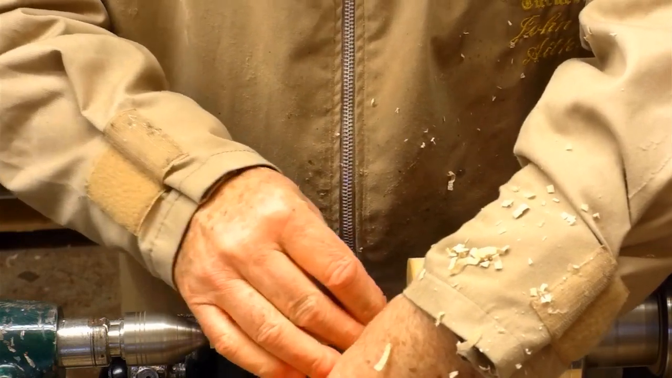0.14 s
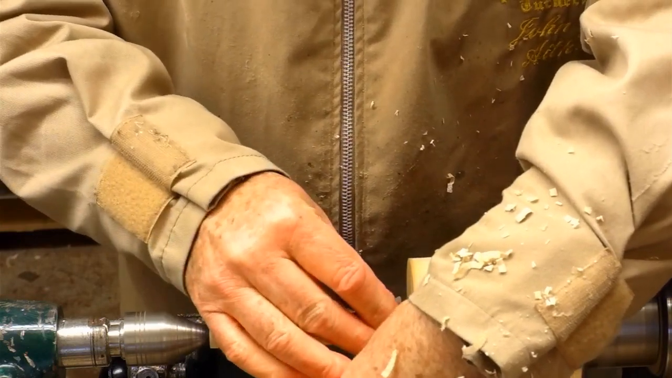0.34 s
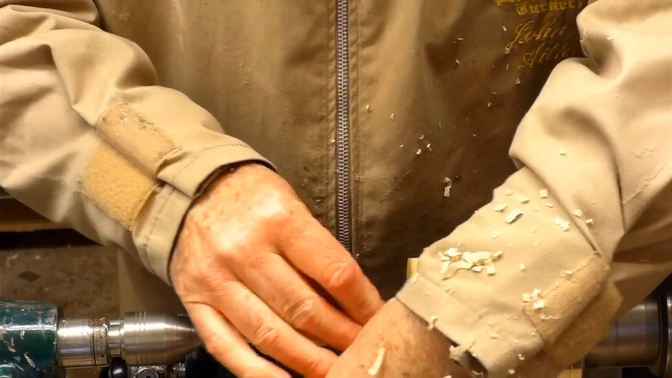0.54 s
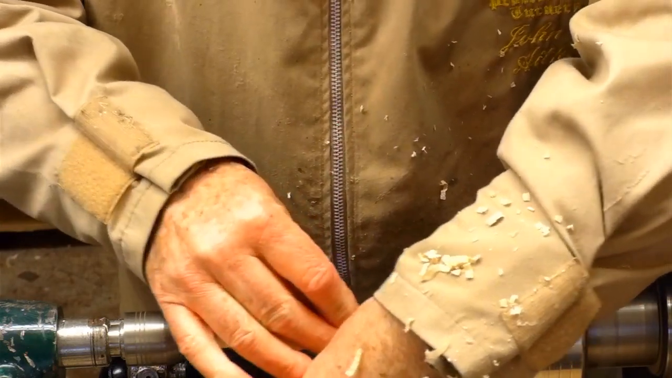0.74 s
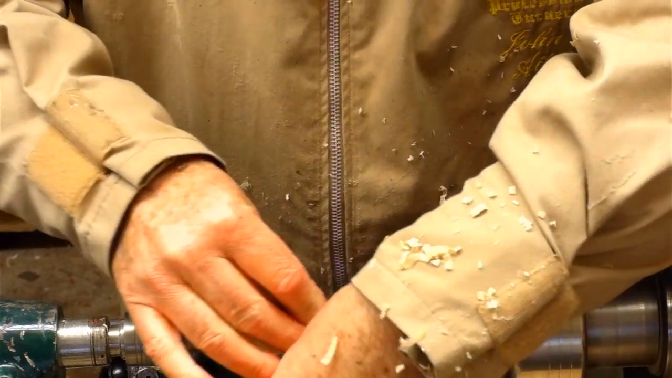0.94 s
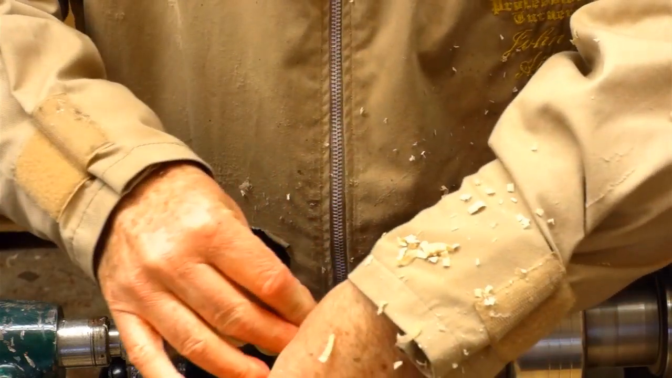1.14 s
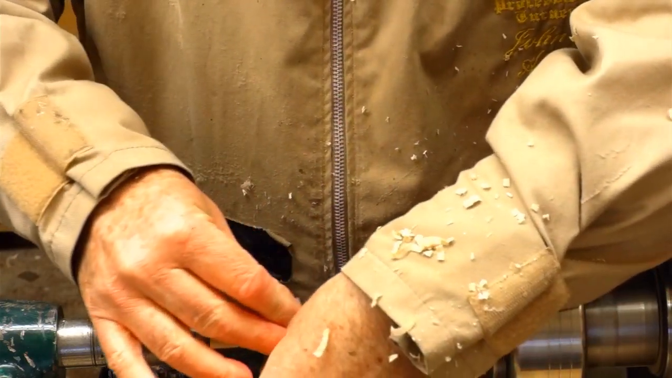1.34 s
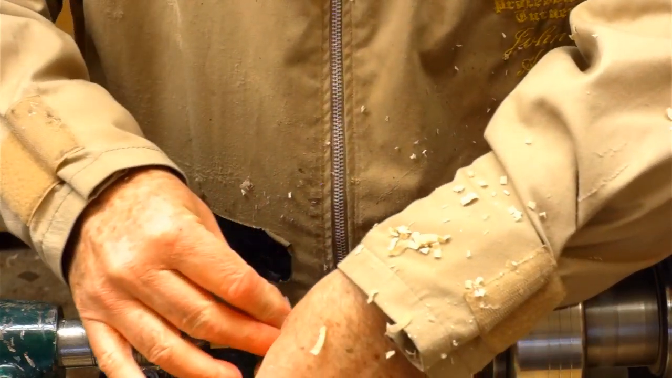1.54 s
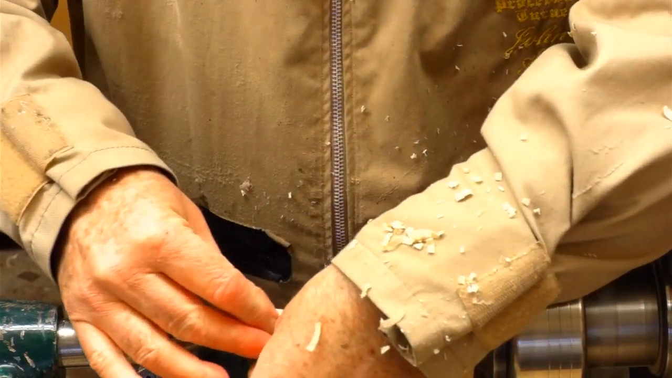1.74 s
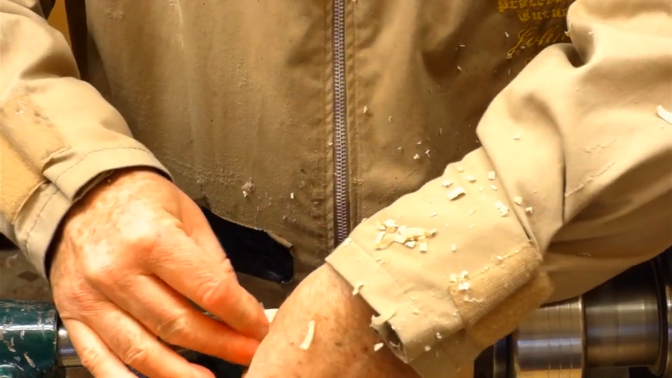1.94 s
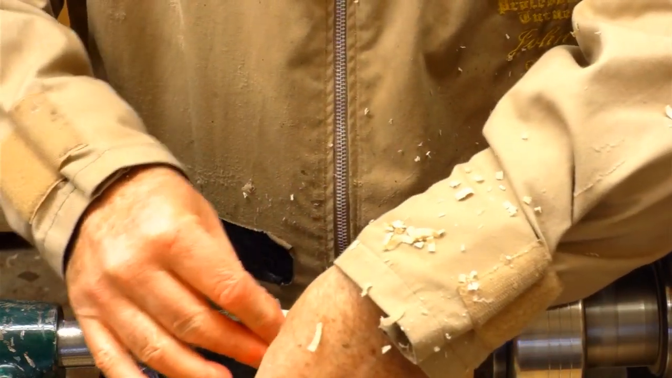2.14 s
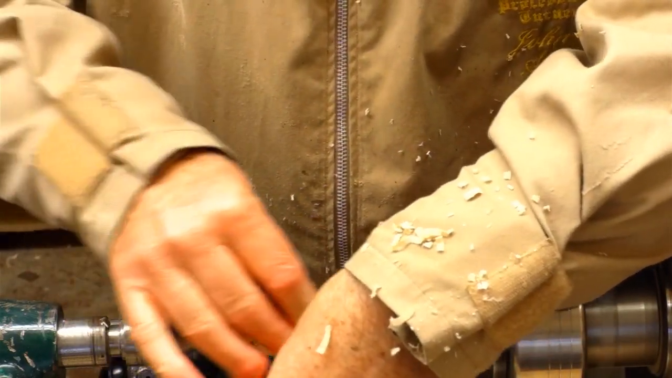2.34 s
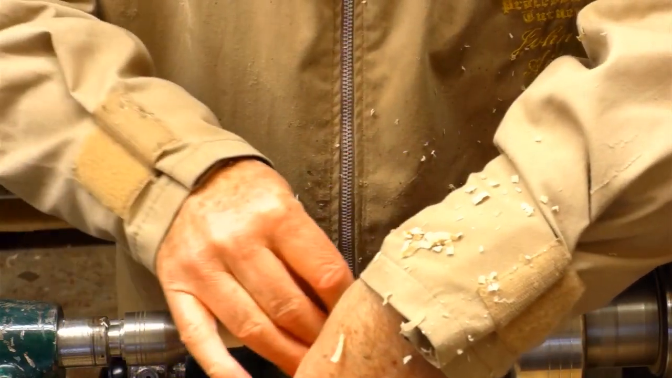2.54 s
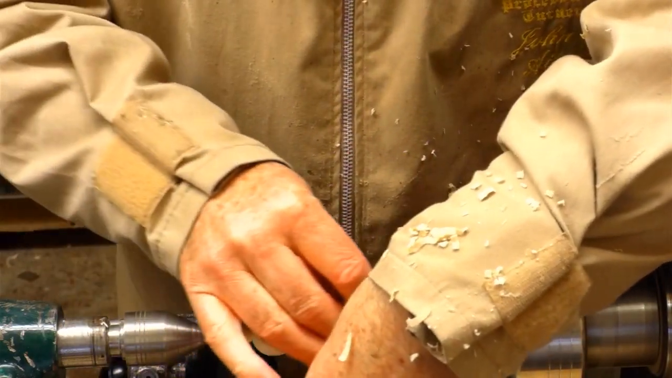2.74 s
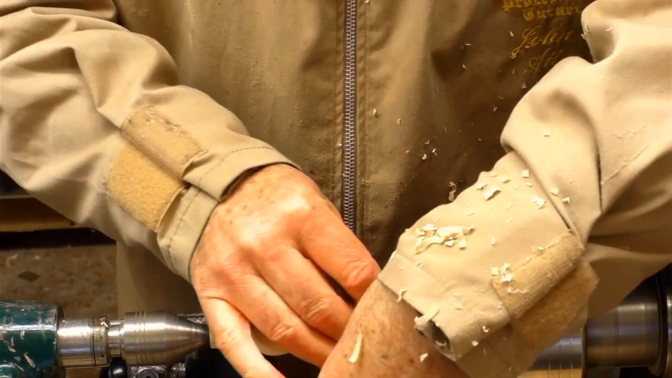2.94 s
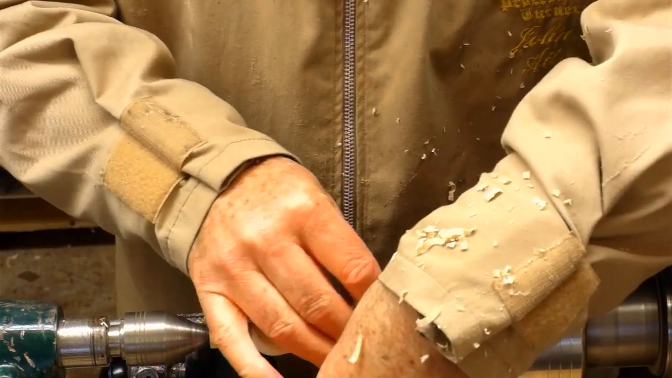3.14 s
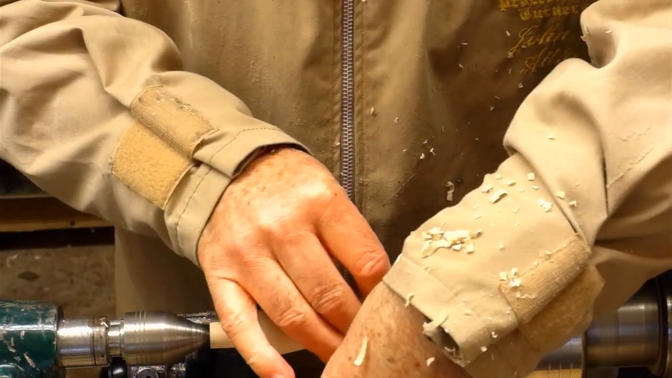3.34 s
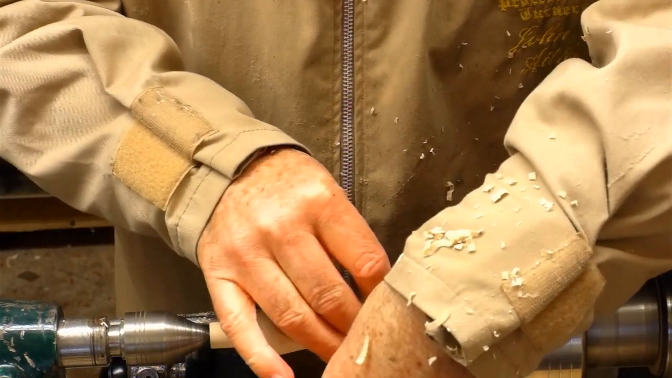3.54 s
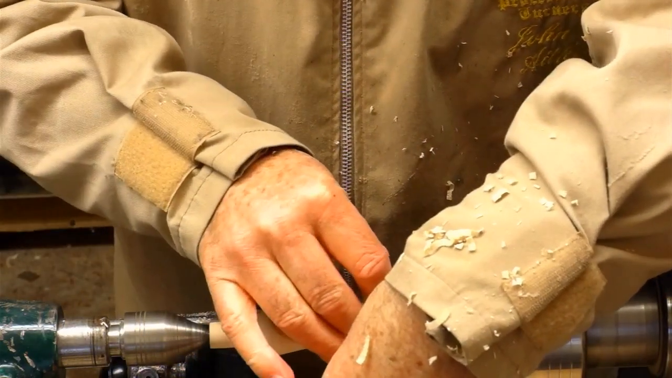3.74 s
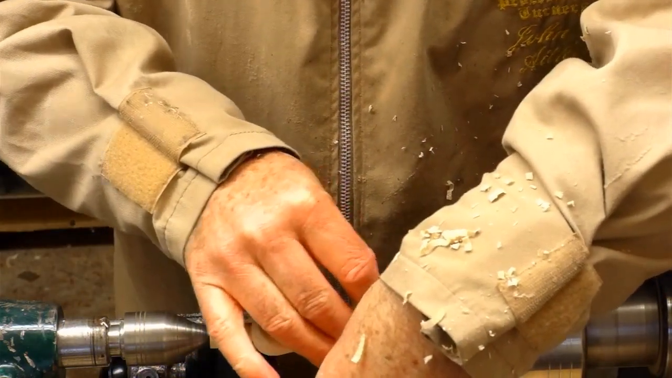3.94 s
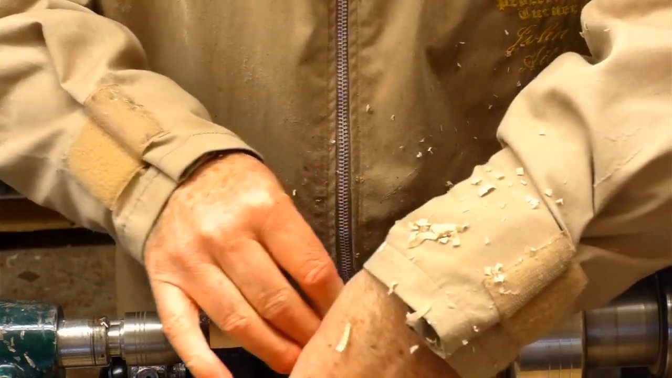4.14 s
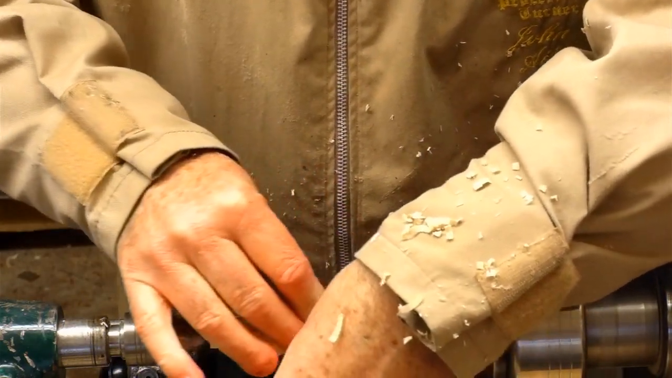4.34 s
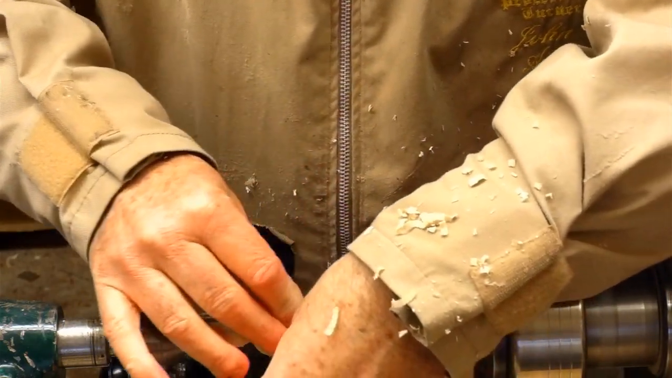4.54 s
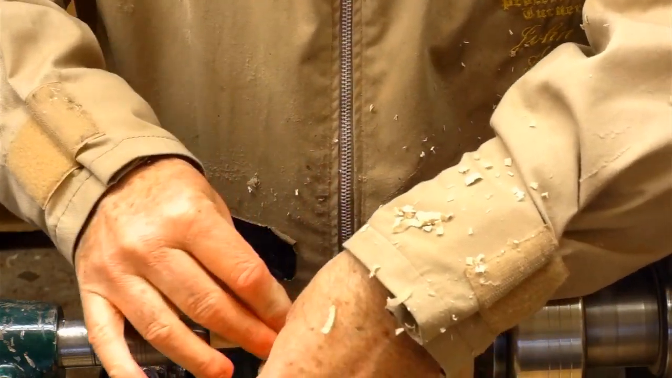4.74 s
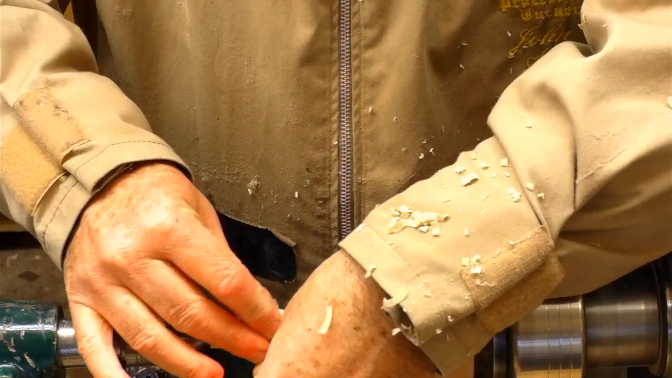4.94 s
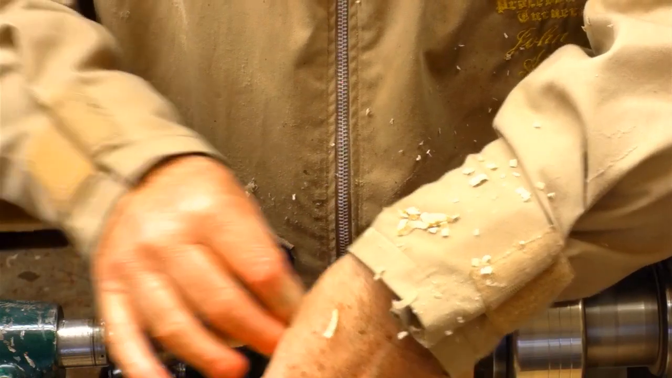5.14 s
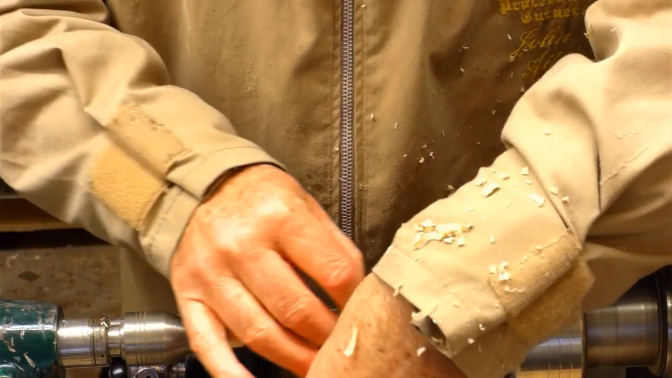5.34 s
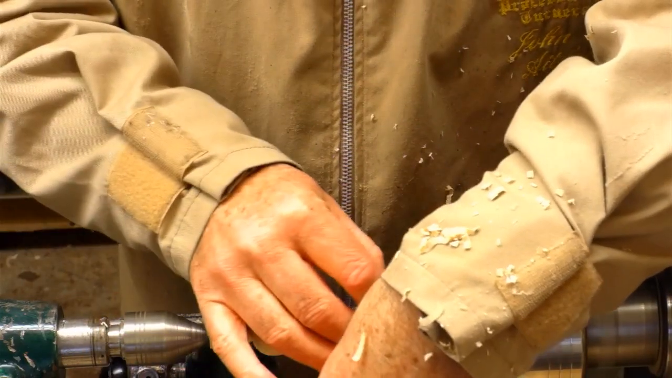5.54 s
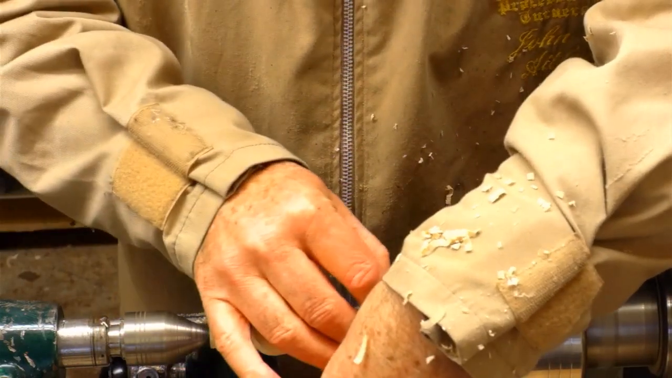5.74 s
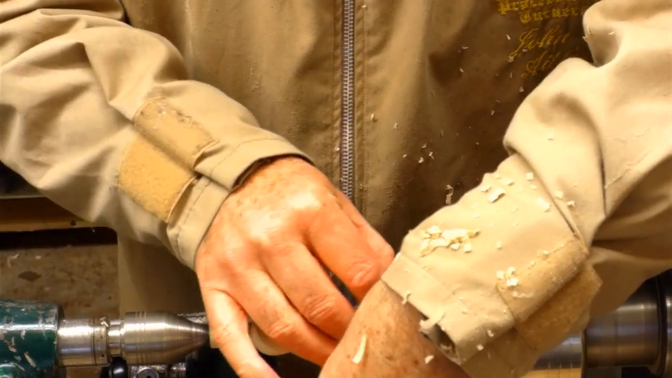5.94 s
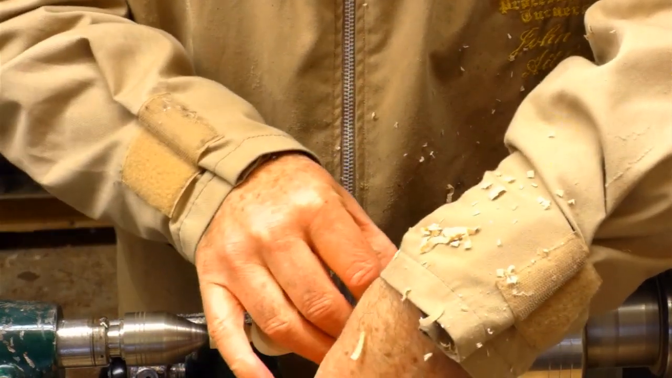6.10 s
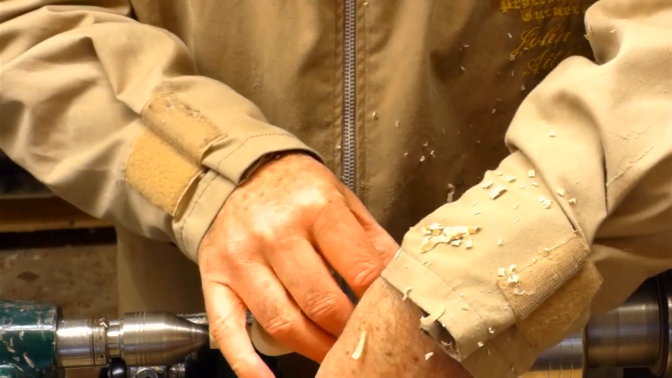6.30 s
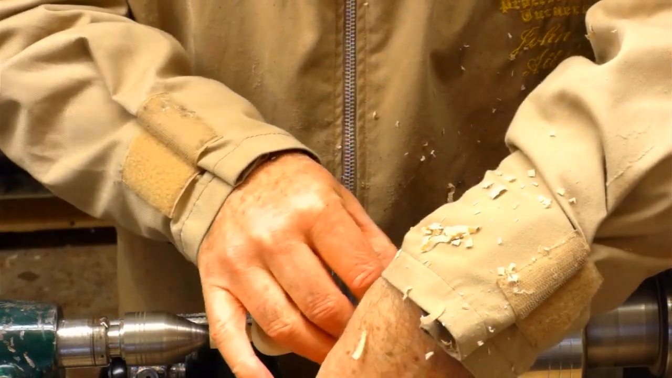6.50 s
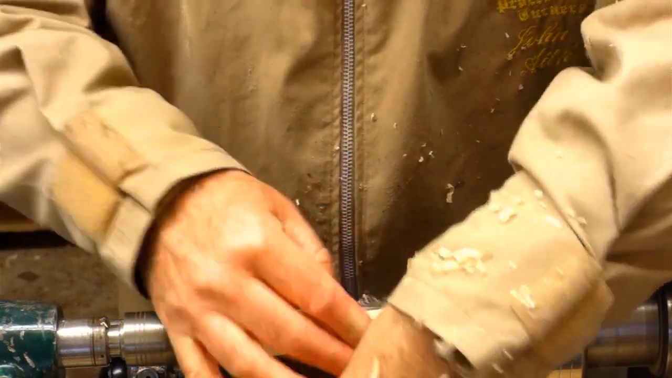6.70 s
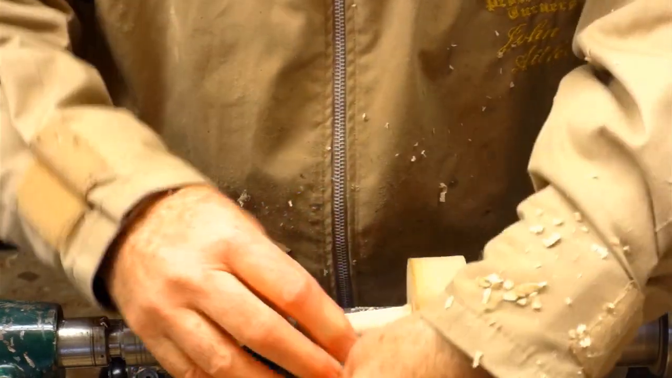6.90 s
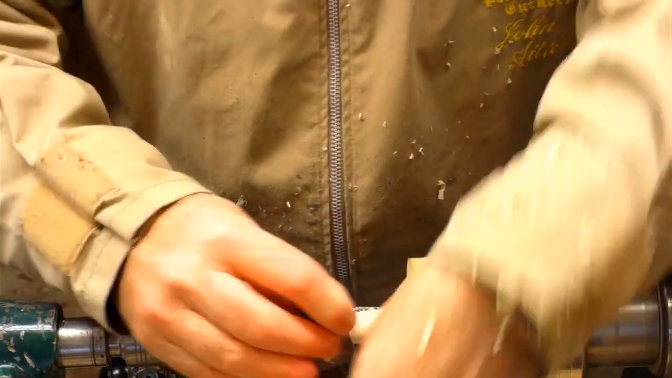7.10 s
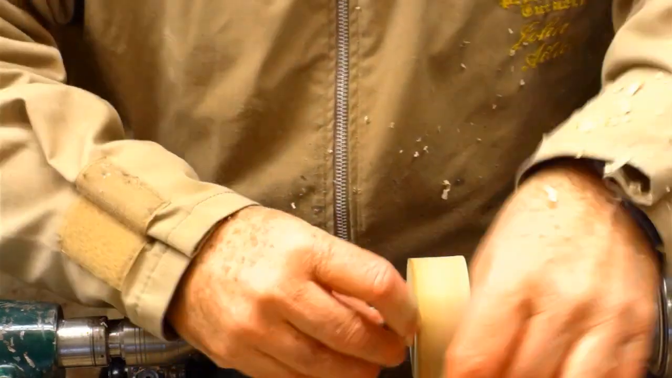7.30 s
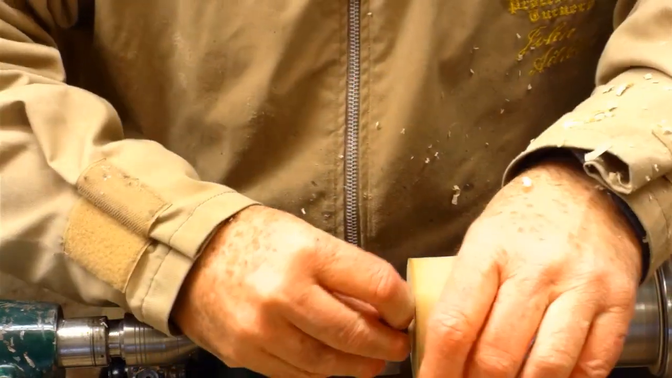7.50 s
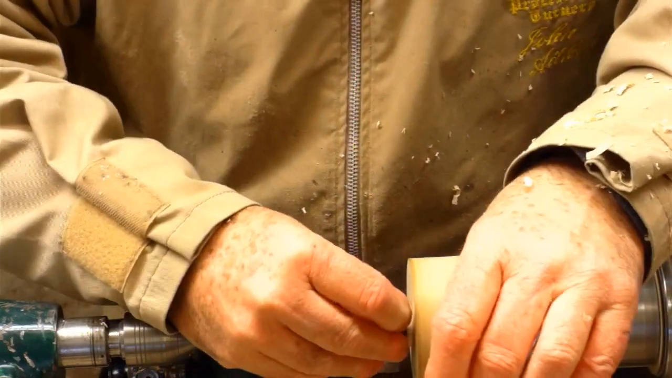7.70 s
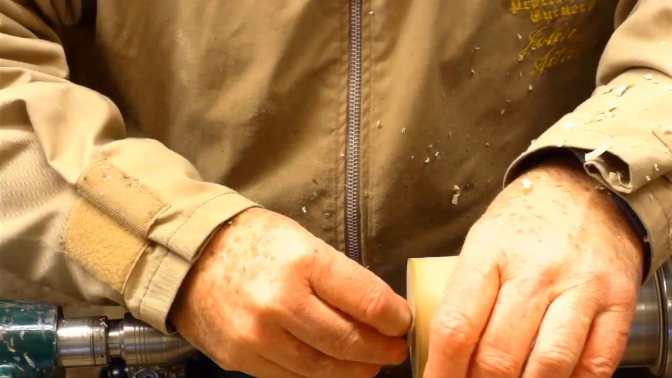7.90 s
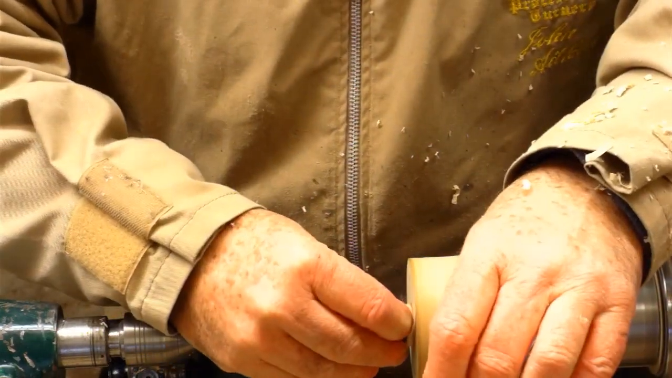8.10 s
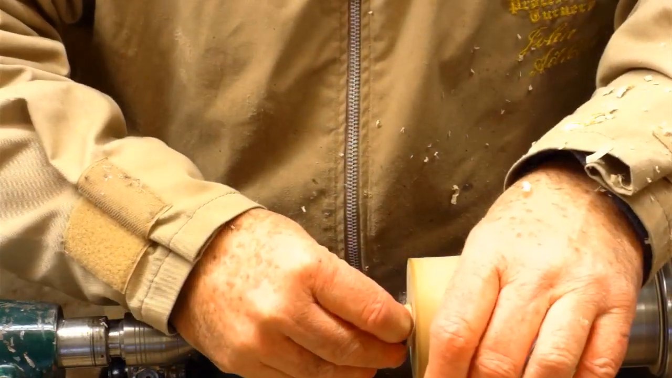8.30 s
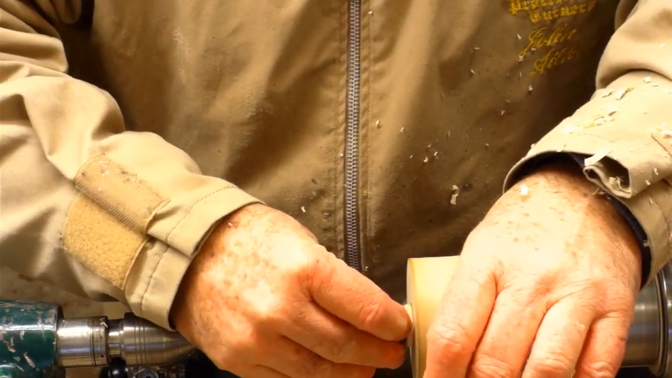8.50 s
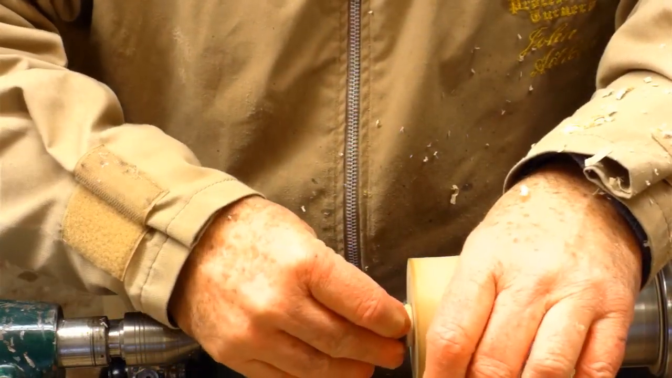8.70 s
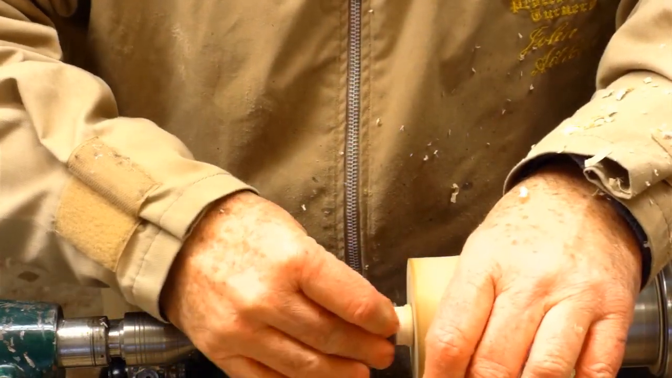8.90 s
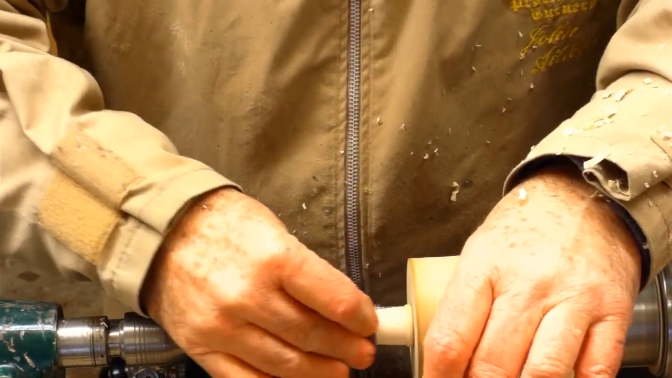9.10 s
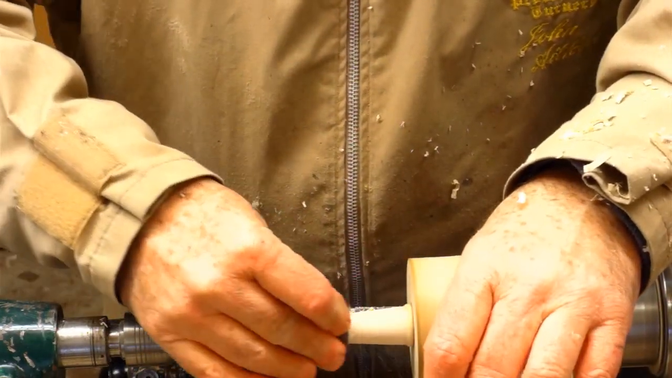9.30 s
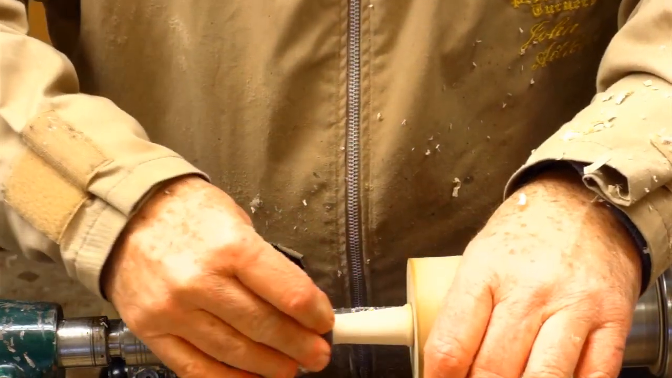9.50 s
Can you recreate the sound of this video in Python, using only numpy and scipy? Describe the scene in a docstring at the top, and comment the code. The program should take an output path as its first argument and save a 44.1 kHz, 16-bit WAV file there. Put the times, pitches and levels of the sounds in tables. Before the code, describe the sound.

Abrasive paper hisses brightly against wood spinning on a humming lathe, lifts away with scuffs and cloth rustle, then returns fainter with quick slaps.

```python
"""From the start, hand-held abrasive paper hisses on a wooden spindle turning in a lathe: grit noise, throbbing
with each turn, excites the resonances of paper and cupped fingers. Puffs of air thud on the one microphone.
After six seconds the paper is lifted: noise bursts scuff and a sleeve rustles. It lands about a second later,
slaps once a turn until it seats, and hisses on, at first fainter, to the end. Beneath it all, motor, belt,
spindle and bearings hum as sines and the housing as filtered noise, with the wood's rasp."""
import sys
import numpy as np
from scipy import signal
from scipy.fft import rfft, irfft, next_fast_len
from scipy.io import wavfile
from scipy.ndimage import uniform_filter1d, map_coordinates

SR = 44100
rng = np.random.default_rng(int(sys.argv[2]) if len(sys.argv) > 2 else 0)


def to_wav(sig):
    """Store sig (one row per channel, or 1-D mono) as 16-bit WAV at the path in sys.argv[1].

    Samples outside -1..1 are clipped; the rate is SR.
    """
    pcm = np.clip(np.atleast_2d(sig), -1, 1) * 32767
    pcm = np.round(pcm).astype(np.int16)
    wavfile.write(sys.argv[1], SR, pcm.T)  # frames by channels


N = 421155  # length in samples
TOP_HZ = 15750  # upper band limit

# Draught between puffs. Each row: time in seconds, level in dB.
CALM_DRAUGHT = [(0, -66), (1.5, -68), (6.3, -68), (6.8, -61), (7.5, -61.5), (8.4, -64.5), (9.55, -65)]
# Spectrum of the draught. Each row: frequency in Hz, density in dB per Hz.
DRAUGHT_SPECTRUM = [(12, -40), (22, -3.5), (55, -1.5), (90, -11), (200, -23), (400, -63)]
# Puffs of air. Each row: middle in seconds, level in dB, frequency in Hz.
PUFFS = [(1.959, -37, 35), (2.043, -36.5, 42), (2.115, -42, 45), (2.138, -37, 54.4), (2.174, -37, 60),
         (2.215, -45, 40), (2.31, -45, 35), (4.562, -44, 45), (4.61, -49, 35), (4.79, -50, 35),
         (4.92, -55, 50), (6.889, -46, 65), (7.235, -46, 40)]
GUST_DB, GUST_HALF_S = -15.5, 0.12  # the gust under each puff: level relative to the puff, half length

# Sleeve rustle as the arm shifts. Each row: time in seconds, level in dB.
SLEEVE_LEVEL = [(6.3, -65), (6.5, -57), (6.6, -69), (6.8, -57), (6.88, -50), (7, -57), (7.15, -59),
                (7.3, -82)]
# Spectrum of the cloth. Each row: frequency in Hz, density in dB per Hz.
CLOTH_SPECTRUM = [(50, -16), (90, 2), (250, -2), (500, -3), (900, -55)]
# Brief soft pips and knocks. Each row: middle in seconds, peak in dB, frequency in Hz, half length in seconds.
PIPS = [(1.625, -43, 574, .008), (1.655, -40, 346, 0.0022), (2.165, -41, 620, 0.0045),
        (8.813, -44, 1260, 0.017)]

SPINDLE_HZ, BELT_HZ, FIELD_HZ = 23.28, 14.31, 74.81  # spindle speed, belt rate, motor's magnetic hum
# Spindle orders. Each row: multiple of the spindle speed, level in dB rms.
SPINDLE_ORDERS = [(4, -72), (6, -76), (9, -75), (16, -75), (18, -70), (20, -68), (21, -68), (40, -75)]
# Belt orders. Each row: multiple of the belt's rate, level in dB rms.
BELT_ORDERS = [(14, -69), (48, -74), (54, -72), (55, -68), (57, -71), (62, -69), (63, -61), (64, -64),
               (69, -70), (71, -68), (72, -66), (73, -68), (74, -68), (75, -68), (79, -61), (80, -69),
               (95, -71), (96, -66), (97, -69), (102, -74), (105, -74), (106, -67), (110, -71), (121, -70),
               (129, -70), (137, -70), (138, -67), (139, -71)]
# Motor field orders. Each row: multiple of the magnetic hum, level in dB rms.
FIELD_ORDERS = [(2, -76), (3, -75), (4, -58), (7, -61), (8, -68), (11, -69), (15, -67), (19, -67),
                (30, -68)]
# Bearing whines. Each row: frequency in Hz, level in dB rms.
BEARING_WHINES = [(533.8, -64.5), (723.5, -69), (799.3, -64.5), (1701, -78), (1711, -69), (1839, -66),
                  (2547, -87)]
DRONE_DB = -75  # the belt's low drone at rest
# Swells of the drone. Each row: middle in seconds, level in dB, half length in seconds.
DRONE_SWELLS = [(1.35, -64, 0.85), (3.35, -60, 0.67), (5.75, -60, 0.69)]
# Modes of the headstock casting, shaken by the drive. Each row: frequency in Hz, width in Hz, relative level in dB.
CASTING_MODES = [(440, 42, 3.5), (601, 77, 2), (800, 160, -3), (940, 57, 0.5), (1050, 120, 5),
                 (1410, 24, -1), (1520, 34, -10), (1723, 31, 5.5), (1890, 13, -2.5), (2010, 66, -0.5),
                 (2090, 67, -0.5), (2580, 31, -21)]
# Spectrum of the broad whirr. Each row: frequency in Hz, density in dB per Hz.
WHIRR_SPECTRUM = [(60, -11), (110, -9), (180, -18), (270, -13), (400, -15), (1200, -15.5), (2400, -25),
                  (3500, -17), (5000, -21.5), (7000, -26), (10000, -33), (16000, -38)]
# The wood's rasp. Each row: time in seconds, level in dB.
RASP_LEVEL = [(0, -55), (0.2, -57), (0.45, -51), (2.2, -49.5), (2.4, -53.5), (3.2, -57), (4.45, -50),
              (5.1, -56), (6.8, -56.5), (8, -54), (9.55, -55)]
# Spectrum of the rasp. Each row: frequency in Hz, density in dB per Hz.
RASP_SPECTRUM = [(700, -38), (1000, -2.5), (1500, 6), (2300, 1.5), (2900, -1), (3500, -4.5)]

# Touches of the lifted paper. Each row: start in seconds, level in dB, fall time in seconds.
SCUFFS = [(6.479, -58, 0.066), (6.652, -61, .03), (6.695, -62, .005), (6.715, -58, .012), (6.764, -52, .02),
          (6.84, -60, .03), (6.953, -55, 0.027), (7.02, -59, 0.56), (7.185, -50, 0.013),
          (7.207, -37, 0.012)]
# Spectrum of a scuff. Each row: frequency in Hz, density in dB per Hz.
SCUFF_SPECTRUM = [(1760, -36), (3000, -10), (4300, -7), (4970, 1), (8420, -11), (9670, -9), (15700, -21)]
SCUFF_ATTACK_S = 0.0037

# Paper on the wood, one list a stroke. Each row: time in seconds, hiss level in dB, then the shares of the
# treble, of the main ring and of the low scrape in dB.
STROKES = [
    [(0, -28.5, -5, -4.5, -11.5), (0.37, -29.0, -5.5, -4.5, -12.5), (0.6, -31.0, -4, -9.5, -11.5),
     (0.8, -32, -1.5, -9.5, -15.5), (1.4, -34.5, -2.5, -5, -15), (1.62, -31, -3.5, -9, -13),
     (1.82, -35.0, -5.0, -7.0, -14), (2.07, -33, -3.5, -8.5, -15.5), (2.3, -31, -6, -3, -13),
     (2.7, -31.0, -7.5, -7.5, -13.5), (3.1, -33, -5.5, -7, -13.5), (3.9, -33.5, -5, -6, -15),
     (4.1, -35.5, -3.0, -10, -16.5), (4.45, -35, -2, -7.5, -16.5), (4.77, -39.0, -2.5, -7, -15.5),
     (4.95, -33, -3, -6.5, -13.5), (5.3, -32.0, -4.5, -7.5, -16.5), (6.322, -34, -4.0, -7.5, -16.5)],
    [(7.217, -44.5, -3, -8.5, -9.5), (7.45, -40.5, -7, -10.5, -12), (7.75, -38.5, -6.5, -8.5, -14),
     (8.15, -38.5, -7, -7.5, -14), (8.5, -36.0, -5, -9, -17.5), (8.82, -34.0, -8.0, -7.5, -14),
     (9.05, -34.5, -6.0, -6, -17.0), (9.38, -37.5, -3, -9.5, -16), (9.55, -35, -3, -9.5, -17.5)],
]
# Resonances of the paper. Each row: frequency in Hz, width in Hz, relative level in dB, then the gain in dB per dB
# of treble share, of ring share and of scrape share.
PAPER_RESONANCES = [(3820, 1850, -8, 0.5, 0.085, 1.3), (4930, 1020, -6.5, 1, 1.22, 0.14),
                    (5760, 2000, -6.5, -0.3, -0.24, -0.61), (7240, 1370, -7.5, -0.13, -0.83, 0.083)]
# Fizz above the resonances. Each row: frequency in Hz, density in dB per Hz.
FIZZ_SPECTRUM = [(7000, -7), (8200, -0.5), (9000, -0.5), (10500, 0.5), (13000, -2), (14000, -1),
                 (15700, -6)]
FIZZ_DB, FIZZ_FOLLOWS = -5.5, 2.07  # relative level, and dB per dB of treble share
# Hollows between fingers, paper and wood, gliding as the hand shifts. Each row: start in seconds, length in
# seconds, first frequency in Hz, last frequency in Hz, lift or dip in dB.
HOLLOWS = [(0, .6, 14800, 14500, -9), (0.225, 0.16, 12000, 8340, 6), (0.447, 0.19, 11500, 8900, 4),
           (.65, 0.63, 10100, 9000, 5), (1.85, 0.33, 9700, 9700, 5), (2.17, 0.22, 9400, 14600, 3.5),
           (2.39, 0.18, 9050, 14500, 7), (2.75, 0.88, 11300, 10600, 5), (2.75, 0.92, 13000, 12300, 6.5),
           (3.685, 0.1, 13200, 10500, 5.5), (2.75, 0.95, 9500, 9400, -1.5), (3.9, 0.63, 9300, 9100, 4.5),
           (3.95, .75, 14000, 14000, -1.5), (4.95, 1.4, 12400, 12300, 6.5), (5.197, 0.57, 10900, 10900, 4),
           (7.332, 0.38, 6750, 6640, 4.5), (7.6, 1.8, 5500, 5500, -2.5), (8.1, 0.72, 10200, 10100, 5),
           (8.854, 0.54, 9800, 10000, 5), (9, 0.47, 8000, 8400, 6.5)]
PORT_EDGE_HZ = 4600  # the small port in front of the microphone passes less below this
RUNOUT_DB, RUNOUT_VARIES_DB = 0.87, 0.2  # throb of the out-of-round wood, and how it varies along it
# Lifting off: the edge trails on the wood for TRAIL_S, fainter by TRAIL_DB after DROP_S, then leaves.
TRAIL_S, TRAIL_DB, DROP_S, LEAVE_DB_PER_S = 0.072, -9, 0.017, -900
# Until the paper seats, a high spot slaps it once a turn: first slap, seated, contrast, half length.
SLAP_S, SEATED_S, SLAP_CONTRAST_DB, SLAP_HALF_S = 7.254, 7.49, 4, 0.0057


def amp(db):
    """Decibel law: the amplitude gain of a level in dB."""
    return np.exp(np.asarray(db) * float(np.log(10) / 20))


def unit(x):
    """Normalisation of power: x at rms 1."""
    return x / np.sqrt(np.mean(x ** 2) + 1e-20)


def along(points, hz):
    """Linear interpolation of (Hz, value) points on a logarithmic frequency axis."""
    f, v = np.transpose(points)
    return np.interp(np.log(hz + 1), np.log(f + 1), v)


def curves(rows, t):
    """Linear interpolation in time of each column after the first, read at the times t."""
    s, *cols = np.transpose(rows)
    return [np.interp(t, s, c) for c in cols]


def bump(t, middle, half):
    """Gaussian envelope: a smooth swell around a moment."""
    return np.exp(-((t - middle) / half) ** 2)


def wobble(rate):
    """Band-limited random fluctuation: a spline through random knots, rate knots a second."""
    coarse = np.arange(0, N + 64, 64)
    knots = rng.standard_normal(int(N * rate / SR) + 4)
    return np.interp(np.arange(N), coarse, map_coordinates(knots, [coarse * rate / SR]))


def filtered(x, response):
    """Linear filtering: the spectrum of x times a response of frequency."""
    m = next_fast_len(N + SR // 2)
    return irfft(rfft(x, m) * response(np.fft.rfftfreq(m, 1 / SR)), m)[..., :N]


def noise(spectrum):
    """Spectral shaping: white noise given a spectrum, cut at its last frequency, at rms 1."""
    white = rng.standard_normal(N)
    return unit(filtered(white, lambda hz: amp(along(spectrum, hz)) * (hz < spectrum[-1][0])))


def hump(hz, centre_hz, width_hz, skirt):
    """Resonance: gain around a centre frequency, of the same total power for every width."""
    return (1 + (2 * (hz - centre_hz) / width_hz) ** 2) ** -skirt * np.sqrt(SR / 2 / width_hz)


def draught():
    """Turbulent pressure on the microphone: air stirred by the work, each puff one dip and swing."""
    t = np.arange(N) / SR
    slow = t[::256]
    power = amp(curves(CALM_DRAUGHT, slow)[0]) ** 2
    for s, db, _ in PUFFS:
        power = power + (amp(db + GUST_DB) * bump(slow, s, GUST_HALF_S)) ** 2
    level = np.interp(t, slow, np.sqrt(power))
    gusty = amp(1.6 * wobble(10) + 1.5 * wobble(2.85))
    air = level * unit(gusty * noise(DRAUGHT_SPECTRUM))
    for s, db, hz in PUFFS:
        near = slice(int((s - .1) * SR), int((s + .1) * SR))
        cycles = (t[near] - s) * hz
        air[near] += amp(db) * np.sin(2 * np.pi * cycles) * bump(cycles, 0, 0.69)
    return air


def handling():
    """Friction of cloth as fluctuating noise, and short soft tones as sines under Gaussian envelopes."""
    t = np.arange(N) / SR
    rustle = amp(curves(SLEEVE_LEVEL, t)[0]) * unit(amp(2.3 * wobble(25)) * noise(CLOTH_SPECTRUM))
    pips = sum(amp(db) * np.sin(2 * np.pi * hz * (t - s)) * bump(t, s, length)
               for s, db, hz, length in PIPS)
    return rustle + pips


def orders(table, base_hz, drift, flicker_db):
    """Order analysis in reverse: flickering sines on multiples of one slightly unsteady speed."""
    turns = np.cumsum(base_hz * (1 + drift * wobble(3))) / SR
    total = np.zeros(N)
    for multiple, db in table:
        level = amp(db + flicker_db * wobble(7))
        total += level * np.sin(2 * np.pi * (multiple * turns + rng.random()))
    return np.sqrt(2) * total


def bearings():
    """Narrow-band tones: the bearings whine at fixed frequencies, wandering in level and phase."""
    t = np.arange(N) / SR
    total = np.zeros(N)
    for hz, db in BEARING_WHINES:
        level = amp(db + 0.83 * wobble(4.5))
        total += level * np.sqrt(2) * np.sin(2 * np.pi * hz * t + 1.43 * wobble(5))
    return total


def belt_drone():
    """Amplitude modulation: the seventh multiple of the belt's rate swells and sinks."""
    t = np.arange(N) / SR
    level = amp(DRONE_DB) + sum(amp(db) * bump(t, s, half) for s, db, half in DRONE_SWELLS)
    return level * np.sqrt(2) * np.sin(2 * np.pi * 7 * BELT_HZ * t + 0.7 * wobble(5.7))


def casting_response(hz):
    """Modal superposition: the powers of the casting's resonances add, falling off at high frequencies."""
    modes = sum(amp(db) ** 2 / (1 + (2 * (hz - centre) / width) ** 2) for centre, width, db in CASTING_MODES)
    return np.sqrt(modes / (1 + (hz / 3200) ** 6))


def lathe():
    """Periodic and random excitation: tones of the drive over noise of the housing; the wood rasps."""
    t = np.arange(N) / SR
    tones = orders(SPINDLE_ORDERS, SPINDLE_HZ, drift=0.00129, flicker_db=2.5)
    tones += orders(BELT_ORDERS, BELT_HZ, drift=0.001207, flicker_db=2.0)
    tones += orders(FIELD_ORDERS, FIELD_HZ, drift=0.00042, flicker_db=-0.8)
    tones += bearings() + belt_drone()
    shake = amp(-54) * unit(filtered(rng.standard_normal(N), casting_response))
    whirr = amp(-56.5) * noise(WHIRR_SPECTRUM)
    rasp = amp(curves(RASP_LEVEL, t)[0]) * noise(RASP_SPECTRUM)
    return tones + shake + whirr + rasp


def scuffs():
    """Transient friction: the lifted paper grazes the wood in noise bursts of quick rise and Gaussian fall."""
    t, level = np.arange(N) / SR, np.zeros(N)
    for s, db, fall_s in SCUFFS:
        since = t[int(s * SR):int((s + .8) * SR)] - s
        rise = np.clip(since / SCUFF_ATTACK_S, 0, 1)
        level[int(s * SR):][:len(since)] += amp(db) * rise * bump(since, 0, max(fall_s, .005))
    return level * noise(SCUFF_SPECTRUM)


def throb(change):
    """Runout: out-of-round wood swings the pressure each turn, its pattern changing as the paper slides along."""
    t = np.arange(N) / SR
    swing = sum(np.sin(2 * np.pi * k * SPINDLE_HZ * t + 2.0 * wobble(change)) / k ** 2.3 for k in range(1, 4))
    return amp((RUNOUT_DB + RUNOUT_VARIES_DB * wobble(2.16)) * swing)


def grit():
    """Random excitation: dense uneven scratches of grains, throbbing with the turn and the hand's tremor."""
    scratches = rng.standard_normal(N) * amp(0.48 * rng.exponential(size=N))
    tremor = amp(0.49 * wobble(15) + 0.49 * wobble(150))
    return unit(scratches * throb(change=1.498) * tremor)


def shares(t):
    """Spectral balance: treble, main-ring and low-scrape shares of the hiss about their means, in dB."""
    rows = sum(STROKES, [])
    return [share - share.mean() for share in curves(rows, t)[1:]]


def slaps(t):
    """Periodic impact: gain of the once-a-turn slaps while the paper finds its seat."""
    turn = (t - SLAP_S) * SPINDLE_HZ
    near = bump((turn - np.round(turn)) / SPINDLE_HZ, 0, SLAP_HALF_S)
    # a little quieter between slaps, louder on them
    return amp(SLAP_CONTRAST_DB * (near - 0.2) * (turn > -.5) * (t < SEATED_S))


def contact(t):
    """Friction needs contact: the hiss follows each stroke, lands at once and trails off after the lift."""
    level = 0
    for stroke in STROKES:
        start, end = stroke[0][0], stroke[-1][0]
        trail_db = TRAIL_DB * np.clip((t - end) / DROP_S, 0, 1)
        leave_db = LEAVE_DB_PER_S * np.clip(t - end - TRAIL_S, 0, 1)
        level = level + amp(curves(stroke, t)[0] + trail_db + leave_db) * (t >= start)
    return level * slaps(t)


def paper_power(hz, t):
    """Resonant filtering: power response of paper and fizz, shared out between treble, ring and scrape."""
    treble, ring, scrape = shares(t)
    fizz = amp(along(FIZZ_SPECTRUM, hz)) * (hz > FIZZ_SPECTRUM[0][0])
    power = (amp(FIZZ_DB + FIZZ_FOLLOWS * treble) * unit(fizz)) ** 2
    for centre, width, db, per_treble, per_ring, per_scrape in PAPER_RESONANCES:
        level_db = db + per_treble * treble + per_ring * ring + per_scrape * scrape
        power = power + (amp(level_db) * hump(hz, centre, width, skirt=1.0)) ** 2
    return power


def hollows_db(hz, t):
    """Cavity resonance: the gliding hollows of the hand lift or dip a moving band, in dB."""
    lift_db = 0
    for start, length, from_hz, to_hz, db in HOLLOWS:
        held = np.clip(np.minimum(t - start, start + length - t) / .04 + .7, 0, 1)
        # a hollow that glides fast is also broad
        width = np.hypot(560, .075 * (to_hz - from_hz) / length)
        centre = np.interp(t, [start, start + length], [from_hz, to_hz])
        lift_db = lift_db + db * held * bump(hz, centre, width)
    return lift_db


def sanding():
    """Source and filter: grit noise passes the paper's resonances, the hand's hollows and the port."""
    hz, t, spectrum = signal.stft(grit(), SR, nperseg=512)
    hz = hz[:, None]
    port_db = -6 / (1 + (hz / PORT_EDGE_HZ) ** 60)
    # fine grit excites little below the paper's first resonance
    fine_grit_db = -8 / (1 + (hz / 3100) ** 16)
    colour = np.sqrt(paper_power(hz, t)) * amp(port_db + fine_grit_db + hollows_db(hz, t))
    colour = colour / np.sqrt(np.mean(colour ** 2, axis=0))
    # narrow random ridges and valleys make the hiss slightly uneven and drift slowly
    ridges = uniform_filter1d(rng.standard_normal(spectrum.shape), size=2, axis=0)
    ridges = uniform_filter1d(ridges, size=60, axis=1)
    shaped = signal.istft(spectrum * colour * amp(1.6 * unit(ridges)), SR, nperseg=512)[1][:N]
    return unit(shaped) * contact(np.arange(N) / SR)


def scene():
    """Superposition: all pressures add at one microphone, which feeds both channels."""
    mono = draught() + handling() + lathe() + scuffs() + sanding()
    return np.array([mono, mono])


def record(dry):
    """Band limitation: nothing passes at or above the upper limit."""
    return filtered(dry, lambda hz: hz < TOP_HZ)


dry = scene()
out = record(dry)
to_wav(out)
```